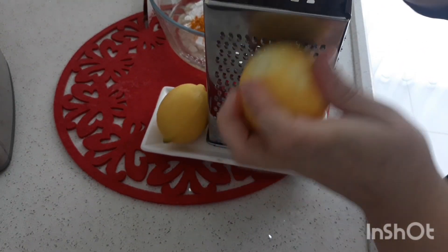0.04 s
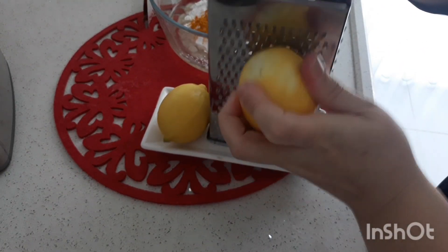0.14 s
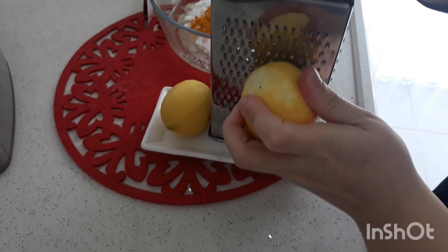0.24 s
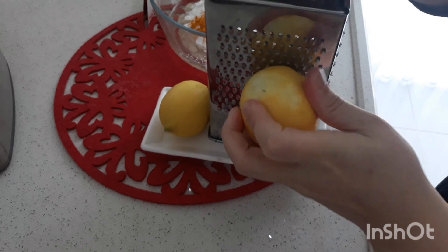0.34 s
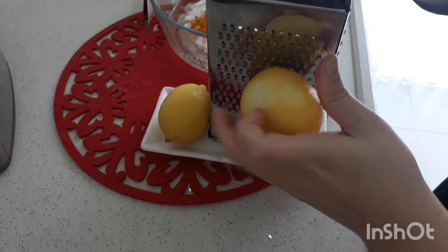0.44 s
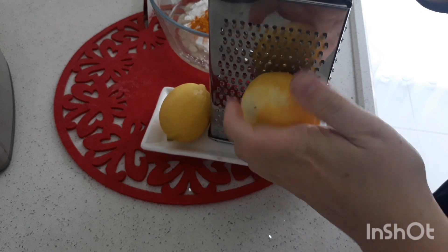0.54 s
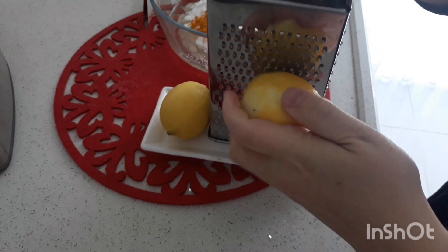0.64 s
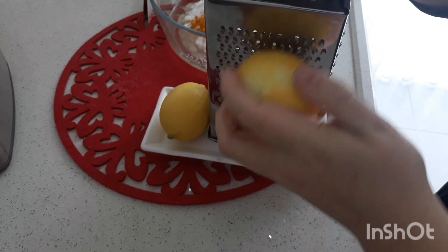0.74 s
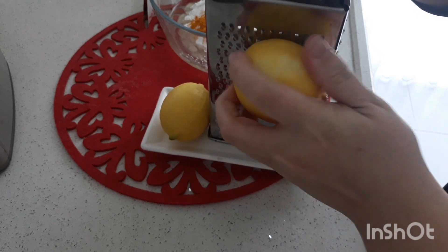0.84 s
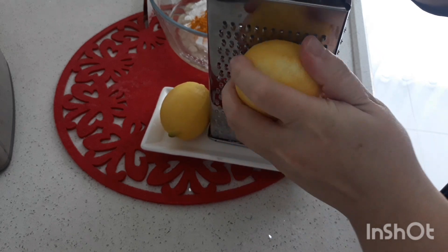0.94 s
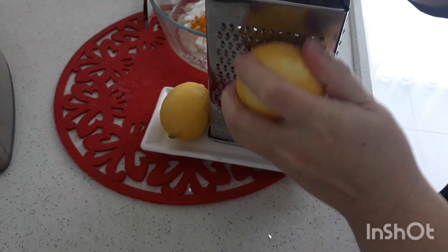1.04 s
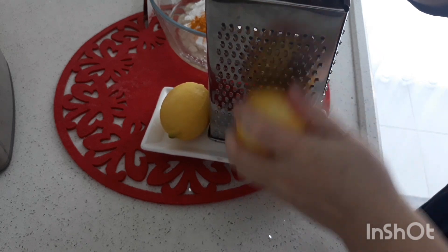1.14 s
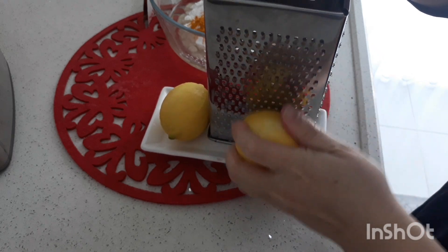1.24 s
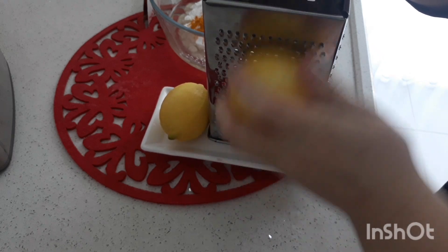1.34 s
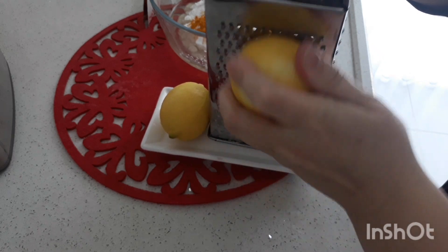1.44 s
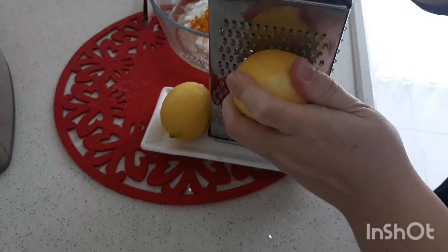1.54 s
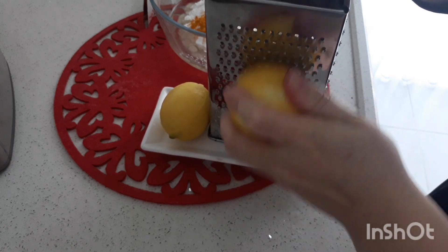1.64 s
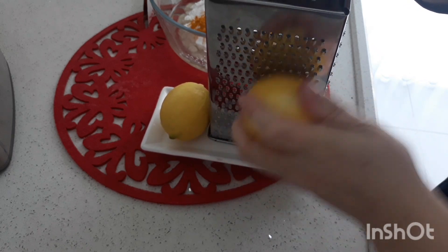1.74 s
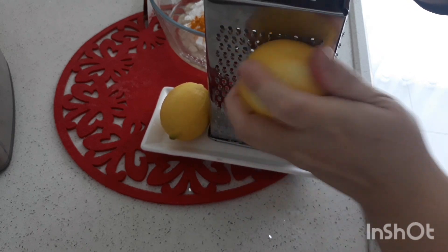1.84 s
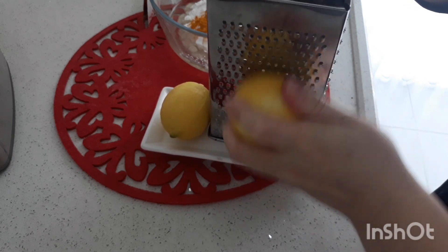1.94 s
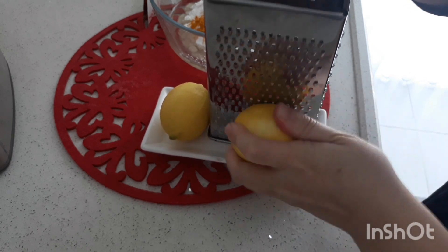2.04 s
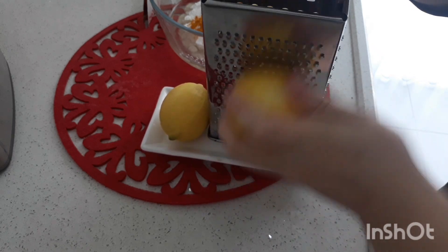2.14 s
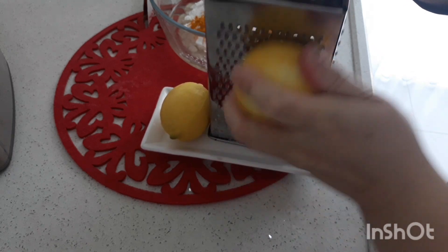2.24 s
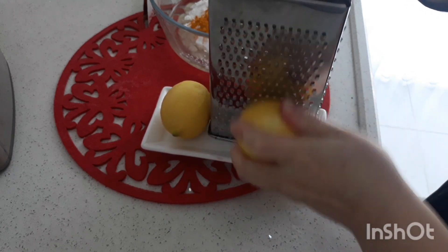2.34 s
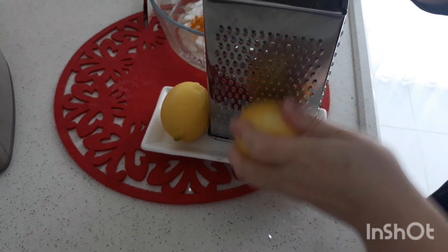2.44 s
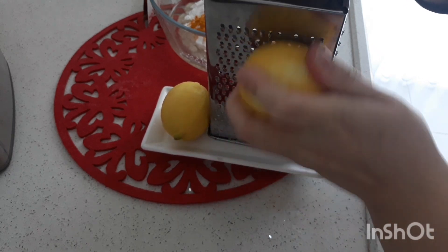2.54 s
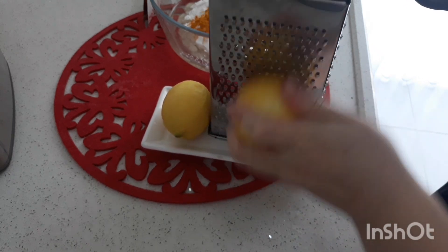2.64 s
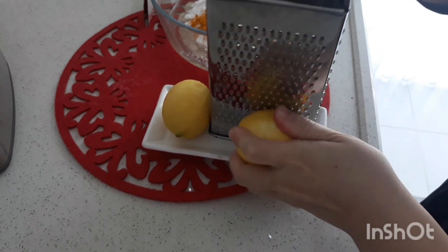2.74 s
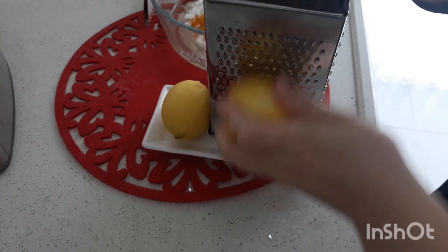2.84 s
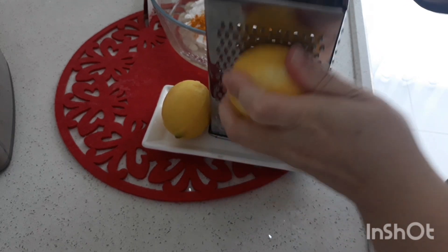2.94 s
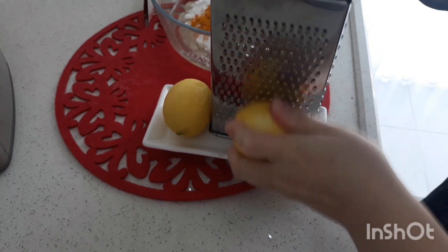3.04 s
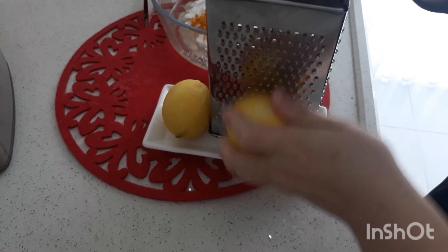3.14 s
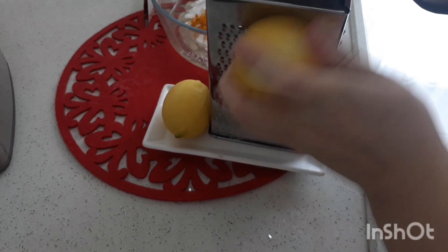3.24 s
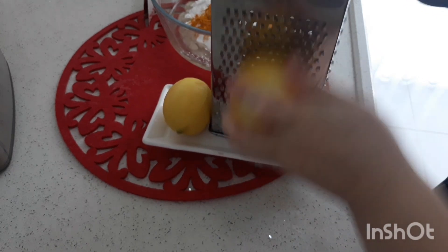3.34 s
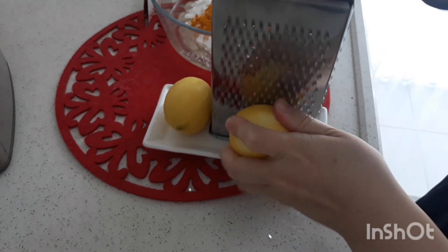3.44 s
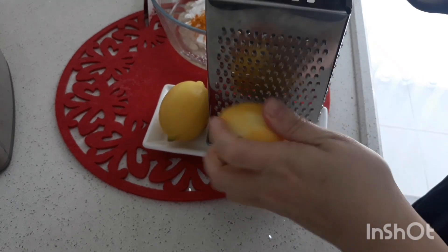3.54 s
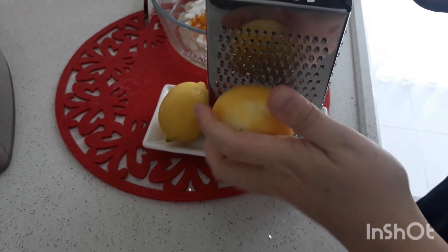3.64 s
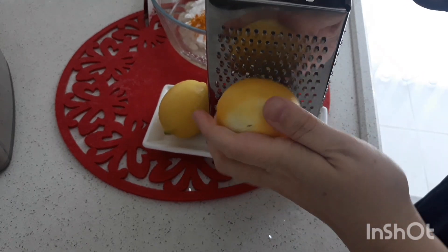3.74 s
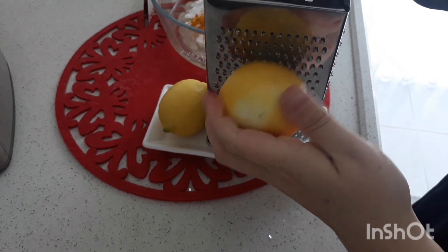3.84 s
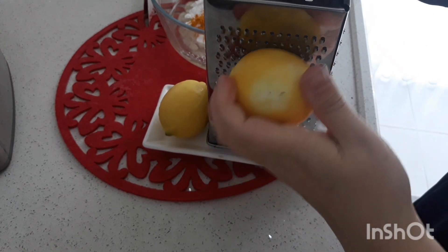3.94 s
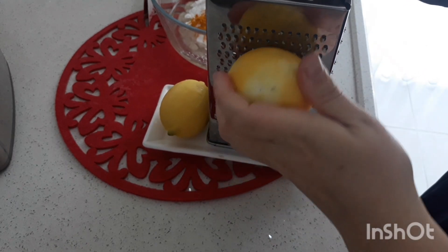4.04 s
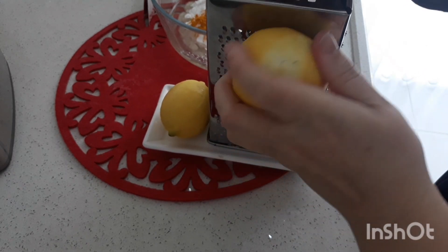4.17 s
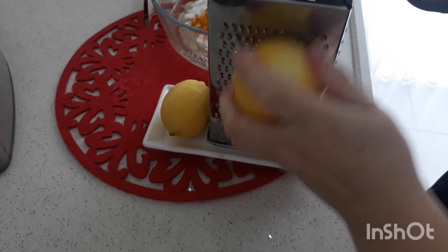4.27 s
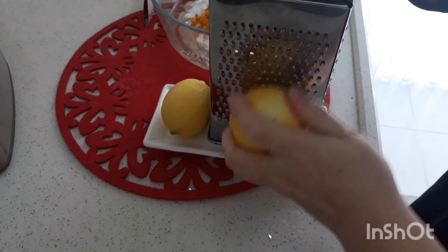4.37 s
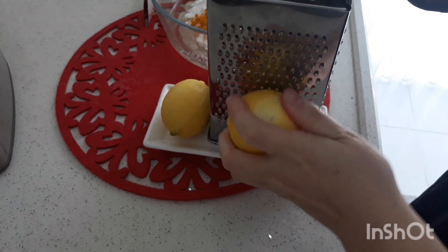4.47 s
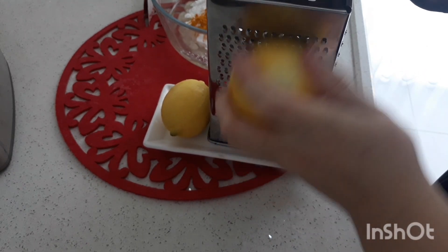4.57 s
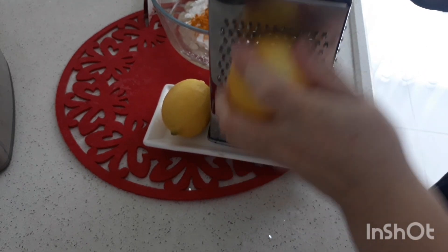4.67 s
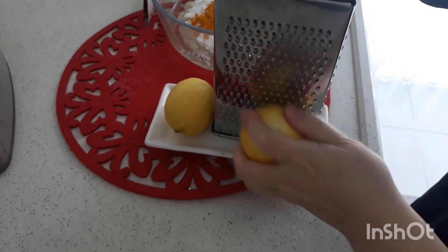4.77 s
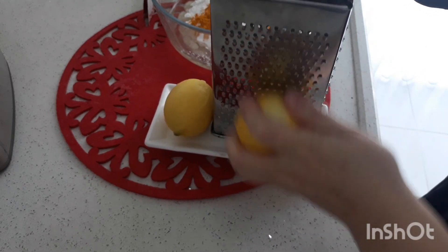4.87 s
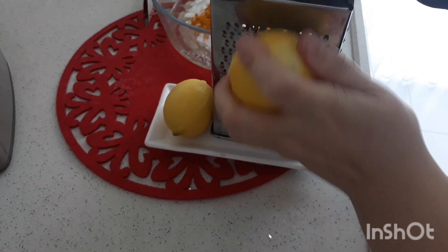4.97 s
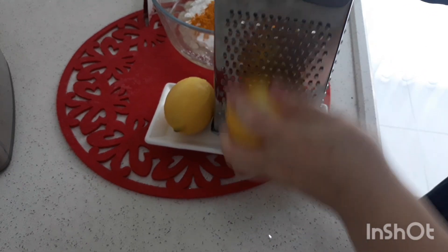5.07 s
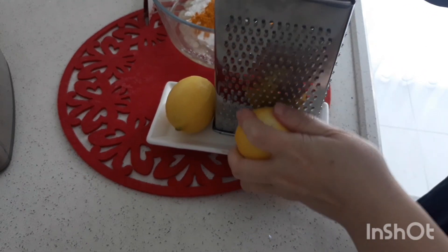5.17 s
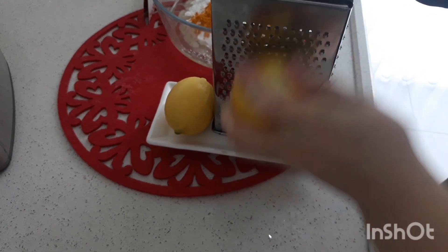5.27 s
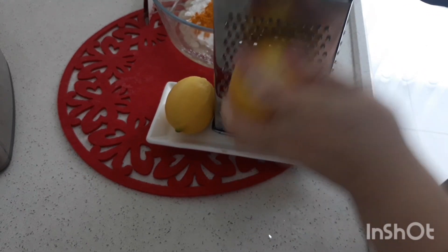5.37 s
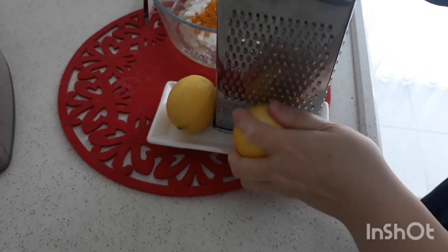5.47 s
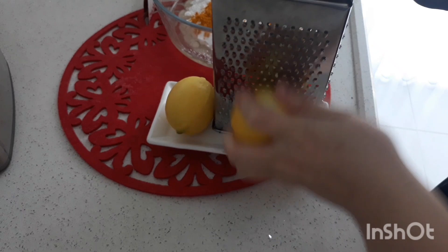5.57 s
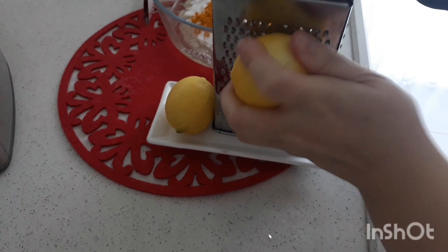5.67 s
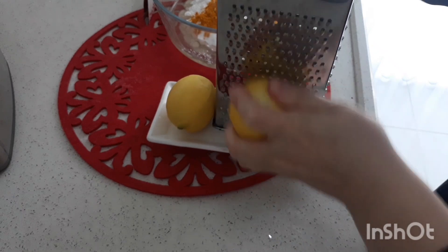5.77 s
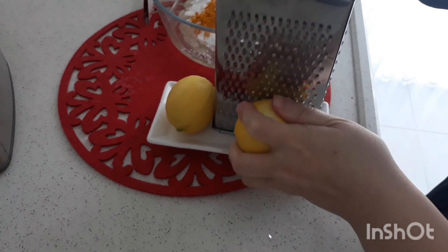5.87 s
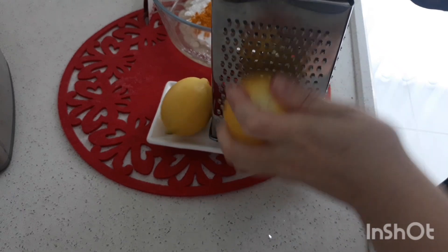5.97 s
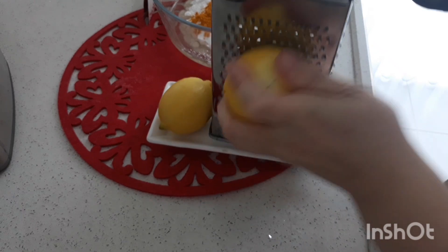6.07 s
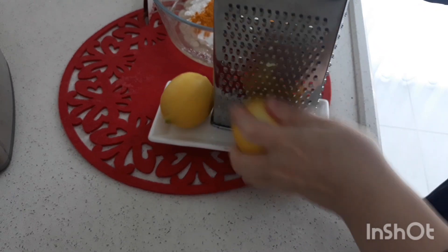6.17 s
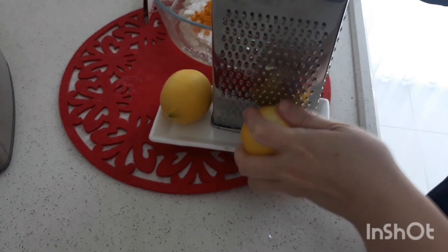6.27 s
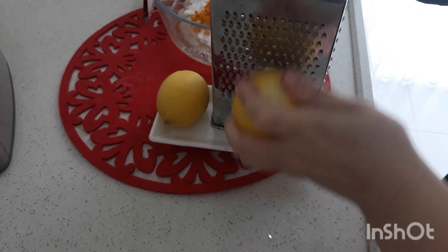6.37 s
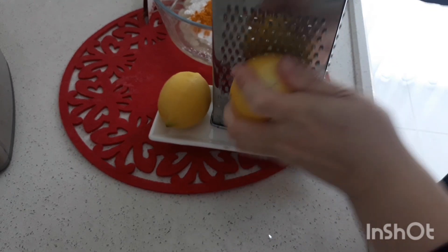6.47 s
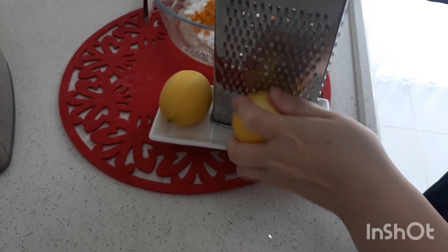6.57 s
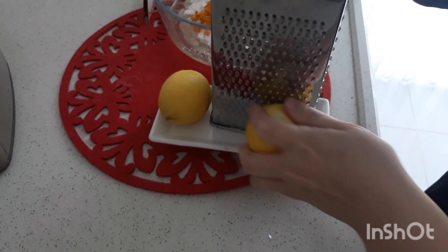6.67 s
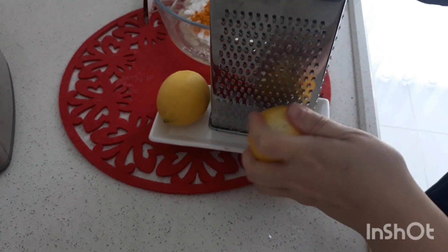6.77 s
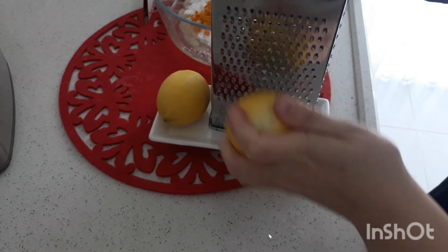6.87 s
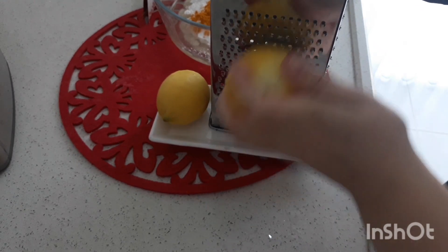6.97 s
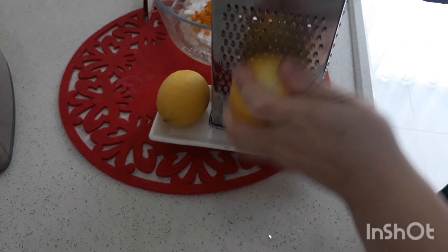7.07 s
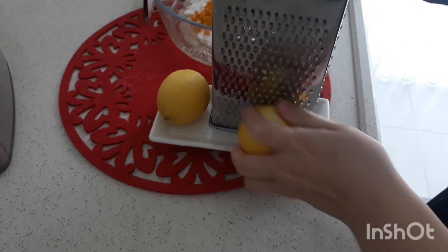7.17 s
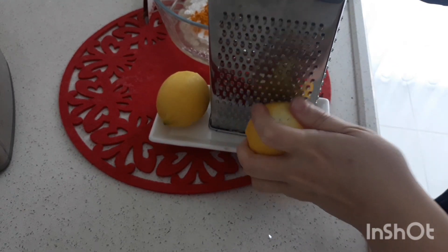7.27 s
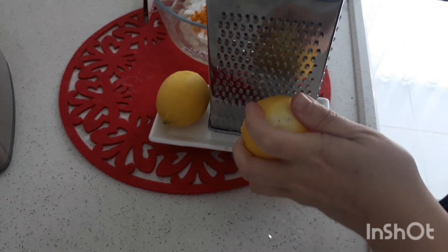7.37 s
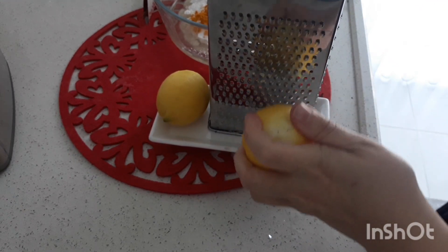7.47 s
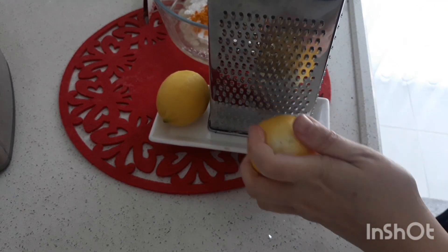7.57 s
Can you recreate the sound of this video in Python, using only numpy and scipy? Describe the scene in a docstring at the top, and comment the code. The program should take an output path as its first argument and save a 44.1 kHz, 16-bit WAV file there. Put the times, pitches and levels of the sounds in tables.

```python
"""Grating a lemon

A lemon is rasped down a steel box grater standing on a china plate. Rows of teeth snag and tear the
rind and shake the sheet steel; the grater rocks and clinks on the plate, and fingers rub the peel.
Hard strokes thump the counter, and a few leave the steel ringing.
A small, live kitchen answers over a low hum."""
import sys
import numpy as np
from scipy import signal
from scipy.fft import rfft, irfft, next_fast_len
from scipy.io import wavfile
from scipy.ndimage import map_coordinates

SR = 44100
rng = np.random.default_rng(int(sys.argv[2]) if len(sys.argv) > 2 else 0)


def inscribe(sig):
    """Save sig as 16-bit PCM at rate SR to the path in sys.argv[1].

    A 1-D sig is mono; a 2-D sig holds one channel per row.
    Samples are clipped to [-1, 1] before scaling.
    """
    pcm = np.round(np.clip(np.atleast_2d(sig).T, -1, 1) * 32767)
    wavfile.write(sys.argv[1], SR, pcm.astype(np.int16))


N = 335586

# tone of tearing rind: freq_hz, level_db
RIND_SPECTRUM = [(25, -46), (55, -21.5), (100, -11), (400, -8), (900, -8.5), (1300, -3), (1800, -6.5),
                 (3300, -2.5), (4900, 0), (6500, -5), (7900, 0), (9000, -9), (10100, -20.5), (11500, -22),
                 (13500, -17), (16000, -22.5)]


def amp(db):
    """Decibels to gain."""
    return 10 ** (np.asarray(db) / 20)


def unit(x):
    """Scale to rms 1."""
    return x / np.sqrt(np.mean(x ** 2) + 1e-20)


def along(points, hz):
    """Read a curve of (freq_hz, value) points on a log frequency axis."""
    freqs, values = np.transpose(points)
    return np.interp(np.log(hz + 1), np.log(freqs), values)


def wobble(rate_hz):
    """A random drift that glides to a new value rate_hz times a second."""
    knots = rng.standard_normal(int(N * rate_hz / SR) + 4)
    return map_coordinates(knots, [np.arange(N) * rate_hz / SR], order=1)


def filtered(x, response):
    """EQ x with a gain given as a function of frequency."""
    size = next_fast_len(len(x) + SR // 2)
    return irfft(rfft(x, size) * response(np.fft.rfftfreq(size, 1 / SR)), size)[:len(x)]


def coloured(x, spectrum, body=lambda hz: 0, size=16384):
    """Minimum-phase EQ of energy 1: a (freq_hz, level_db) curve plus a body's resonances in dB."""
    hz = np.fft.rfftfreq(size, 1 / SR)
    cepstrum = irfft(np.log(amp(along(spectrum, hz) + body(hz))))
    cepstrum[1:size // 2] *= 2
    cepstrum[size // 2 + 1:] = 0
    kernel = irfft(np.exp(rfft(cepstrum)))
    return signal.fftconvolve(x, kernel / np.linalg.norm(kernel))[:len(x)]


def fade(t, t60):
    """Falls 60 dB in t60 seconds."""
    return np.exp(-np.log(1000) * t / np.maximum(t60, 1e-3))


def add(track, start_s, sound):
    """Mix a sound into the track at start_s."""
    start = max(round(start_s * SR), 0)
    track[start:start + len(sound)] += sound[:N - start]


def hand_move(start_s, rise_s, fall_s, easing=1, release_power=1.13):
    """Friction follows the hand as it speeds up from rest and slows to rest again."""
    phase = np.interp(np.arange(N) / SR, start_s + np.cumsum([0, rise_s, fall_s]), [0, np.pi / 2, np.pi])
    return np.abs(np.sin(phase)) ** np.where(phase < np.pi / 2, easing, release_power)


def hum(level_db=-53):
    """The kitchen's room tone: a low, steady bed of noise."""
    # tone of the background: freq_hz, level_db
    hum_spectrum = [(25, -17), (50, -22), (100, -4), (170, -11), (280, -2), (450, -10.5), (700, -19),
                    (1100, -23.5), (2800, -36.5), (7700, -35), (9600, -46.5), (16000, -38.5)]
    return amp(level_db) * unit(coloured(rng.standard_normal(N), hum_spectrum))


def snags(rate_hz, scatter_db=4, rows_db=0.7, row_rate_hz=240, hiss=0.7):
    """Tiny random snaps, clumped as when fruit meets each row of teeth; crowded snaps blur into hiss."""
    size = amp(scatter_db * np.clip(rng.standard_normal(N), -2, 2)) / np.sqrt(rate_hz)
    snaps = (rng.random(N) < rate_hz / SR) * size * rng.choice([-1, 1], N)
    blur = hiss * np.sqrt(rate_hz / np.max(rate_hz)) * rng.standard_normal(N)
    return unit((unit(snaps) + blur) * amp(rows_db * wobble(row_rate_hz)))


def steel_walls(hz):
    """Boost in dB from the sheet steel: its resonances add their power to the plain rasp."""
    # wall resonances, damped by the fruit: pitch_hz, width_hz, level_db (against the plain rasp)
    resonances = [(425, 40, 3), (665, 50, 10), (1217, 60, 3), (1350, 55, 7), (1580, 50, 4), (1997, 40, 10),
                  (2126, 30, 6), (2218, 40, 4), (2616, 120, 0), (3133, 100, 0), (3354, 130, -1),
                  (3652, 70, 3), (4044, 40, 2), (4384, 90, 1), (4902, 40, -1), (5172, 55, 2), (5313, 35, 0),
                  (5457, 45, 1), (5701, 40, 1), (7397, 120, -1), (7950, 45, 0)]
    power = sum(amp(db) ** 2 / (1 + (2 * (hz - pitch) / width) ** 2) for pitch, width, db in resonances)
    return 10 * np.log10(1 + power)


def tooth_pings(centre_hz=4700, spread=.33, t60=0.02, scatter_db=3.0, top_hz=8600, count=7000, size=512):
    """Each tooth that springs free rings for a moment at a pitch of its own."""
    pitch_draw, level_draw = np.hsplit(rng.standard_normal((count, 2)), 2)
    starts = rng.integers(0, N, (count, 1))
    t = np.arange(size) / SR
    hz = centre_hz * np.exp(spread * pitch_draw)
    strength = (hz < top_hz) * amp(scatter_db * np.clip(level_draw, -2, 2))
    rings = strength * np.cos(2 * np.pi * hz * t) * fade(t, t60)
    return unit(np.bincount((starts + np.arange(size)).ravel(), rings.ravel(), N)[:N])


def rasp(level_db=-3.5, ping_db=-8, split_hz=1300, firm_db=-20.5, lift_off_t60=0.13):
    """Each stroke tears the rind and drives the walls, then drags lightly until the fruit lifts off."""
    # strokes of the lemon: start_s, rise_s, fall_s, easing (1 bites at once, 3 creeps in),
    # level_db, low_shelf_db, drag_s, drag_db
    strokes = [ (0.0, 0.006, 0.038, 0.51, -30, 3.5, 0.14, -49.5),
               (0.103, 0.029, .08, 0.92, -27.5, 1.5, .12, -40),
               (1.028, 0.092, 0.11, 2.9, -22.5, 0, .27, -41),
               (1.411, .065, 0.029, 1.2, -32, 2, 0.061, -46.5),
               (1.608, 0.032, .06, 0.91, -26.5, 0, .1, -47),
               (1.85, 0.096, 0.12, 2.86, -20, -4, 0.19, -40.5),
               (2.223, 0.086, 0.08, 1.6, -17, -3, .17, -37),
               (2.568, 0.095, 0.074, 1.75, -14.5, -4, 0.17, -39),
               (2.932, 0.071, .085, 1.1, -17, 0, .2, -37.5),
               (3.279, 0.052, 0.1, 2.2, -12.5, -3.5, .16, -37.5),
               (4.242, 0.089, 0.086, 2, -18, -2, .21, -48), (4.635, 0.086, 0.1, 1.8, -15, -1.5, 0.19, -37),
               (4.995, 0.086, .058, 1.88, -12, -1.5, .16, -36),
               (5.347, 0.064, 0.085, 1.2, -14, -1.5, .19, -39.5),
               (5.681, 0.066, 0.081, 1.6, -20, 1, .12, -39),
               (6.072, 0.076, 0.074, 1.3, -16.5, -0.5, .14, -42),
               (6.447, 0.085, 0.061, 1.7, -20, 1.5, .12, -40),
               (7.037, 0.078, .06, 1.3, -18.5, -1, .09, -42), ]
    t = np.arange(N) / SR
    force, low_force = np.full(N, 1e-9), np.full(N, 1e-9)
    for start_s, rise_s, fall_s, easing, db, low_shelf_db, drag_s, drag_db in strokes:
        since_peak = t - start_s - rise_s
        drag = amp(drag_db) * (since_peak > 0) * fade(np.maximum(since_peak - drag_s, 0), lift_off_t60)
        contact = np.maximum(amp(db) * hand_move(start_s, rise_s, fall_s, easing), drag)
        force += contact
        low_force += amp(low_shelf_db) * contact
    dull_db = np.clip(.2 * (firm_db - 20 * np.log10(force)), 0, 6.5)  # a lighter bite sounds duller
    low_gain = amp(dull_db) * low_force / force
    force *= amp(1.51 * wobble(rate_hz=60))  # the bumpy rind bites unevenly
    # a firm stroke engages many teeth at once; a light one crackles over a few
    teeth = force * snags(rate_hz=350 + 4800 * np.sqrt(force / force.max()))
    lows = filtered(teeth, lambda hz: 1 / (1 + (hz / split_hz) ** 4))
    tearing = coloured(teeth + (low_gain - 1) * lows, RIND_SPECTRUM, steel_walls)
    return amp(level_db) * tearing + amp(ping_db) * force * tooth_pings()


def scratches(level_db=-2):
    """The lemon touches down or catches on the teeth: short, thin scratches."""
    # brief contacts: start_s, level_db, t60_s, rise_s, low_cut_hz
    contacts = [(.012, -37.5, 0.043, .01, 3000), (.138, -16.5, 0.083, .008, 900),
                (.179, -16.5, 0.11, 0.0185, 500), (0.483, -39.5, 0.057, 0.013, 4000),
                (0.6648, -46, 0.097, .01, 1180), (1.478, -14, .05, 0.015, 1500),
                (2.346, -13, 0.075, 0.013, 1000), (2.589, -29, 0.055, .006, 700),
                (2.641, -15.5, 0.068, .008, 1500), (3.171, -28, .1, .03, 600),
                (3.227, -29.5, 0.11, 0.016, 900), (3.411, -12.5, 0.026, 0.0045, 4030),
                (3.908, -46.5, 0.26, 0.081, 6970), (4.114, -48, 0.19, .02, 1500),
                (4.266, -31, 0.051, 0.0065, 600), (4.627, -40.5, 0.093, 0.0091, 2500),
                (4.665, -17, .08, .008, 900), (4.739, -8, 0.091, .008, 1006), (5.022, -16, .07, .008, 900),
                (6.094, -23.5, .05, .005, 900), (6.171, -18.5, 0.066, .008, 700),
                (6.462, -25.5, 0.045, .005, 900), (6.987, -53, 0.11, 0.011, 1980)]
    out, t = np.zeros(N), np.arange(SR // 3) / SR
    for start_s, db, t60, rise_s, low_cut_hz in contacts:
        graze = coloured(rng.standard_normal(len(t)), RIND_SPECTRUM, steel_walls)
        graze = unit(filtered(graze, lambda hz: hz ** 2 / (low_cut_hz ** 2 + hz ** 2)))
        add(out, start_s, amp(db + level_db) * graze * fade(t, t60) * (1 - fade(t, rise_s)))
    return out


def clinks(ring_db=-4.5, crack_db=-2.0, hold_s=0.028):
    """The grater's rim lands on the plate; the contact point decides which modes ring."""
    # rim landings: start_s, level_db, hardness_db, contact_point (0 side, 1 rear, 2 and up front)
    landings = [(0.1031, -13, 1, 0.88), (0.1389, -15, -2, 1.83), (0.318, -32.5, -14, 1.5),
                (0.508, -31.5, -11.5, 1.84), (0.8012, -39, -25, 1.66), (1.404, -16, -6, 1.32),
                (1.496, -23, -16, 1.8), (2.2211, -18, 0.5, 1), (2.936, -17.5, -3.5, 0.035),
                (3.256, -25.5, -4.5, 1.66), (3.4745, -19.5, -7, 1.5), (3.499, -22.5, -2.5, 1.9),
                (4.0124, -29, -10, 1.89), (4.266, -35, -13, 2.9), (4.667, -16.5, -11.5, 1.66),
                (5.344, -18, -4.5, 0.31), (5.6615, -31.5, -15, 0.38), (5.731, -24, -3.5, 2),
                (5.9629, -16.5, -5, 1.9), (6.062, -22.5, -9.5, 1.8), (6.793, -21.5, -10.5, 1.89),
                (7.034, -28, -9, 1.98), (7.354, -26.5, -0.5, 1.15)]
    # modes of rim and plate, by where they are struck: pitch_hz, t60_s, side_db, rear_db, front_db
    rim_modes = [(699, 0.14, -9.5, -13, -18.5), (1116, 0.45, -16, -14.5, -18.5),
                 (1333, 0.08, -15, -42.5, 5), (1433, 0.16, -25.5, -26, -3.5), (1576, 0.1, -10.5, 3, -5),
                 (1713, 0.18, -12.5, -8.5, -20), (2450, 0.079, 1.5, -3.5, -10),
                 (2650, 0.38, -17, -14, -12.5), (3290, 0.11, -17, -12, -17), (4660, 0.34, -11, -8.5, -19.5),
                 (4490, 0.2, -8.5, -3, -29.5), (5120, .07, -9, -21, -22), (6400, 0.069, -14.5, -22.5, -33),
                 (7300, .06, -32, -9.5, -25), (7340, 0.1, -12, -9.5, -28)]
    # crack of steel on china: freq_hz, level_db
    crack_spectrum = [(100, -21.5), (450, -3), (900, -0.5), (3000, 0), (8000, 0), (9800, -22),
                      (16000, -28.5)]
    out, t = np.zeros(N), np.arange(SR // 4) / SR
    # each clink holds for a moment, then dies away quickly
    shape = (1 - fade(t, 0.0026)) * np.exp(-(t / hold_s) ** 2)
    for start_s, db, hardness_db, point in landings:
        ring = np.zeros(len(t))
        for hz, t60, *struck_db in rim_modes:
            strength = amp(np.interp(point, [0, 1, 2], struck_db) + rng.normal(0, 1))
            ring += strength * fade(t, t60) * np.sin(2 * np.pi * (hz * t + rng.random()))
        crack = coloured(rng.standard_normal(len(t)) * fade(t, t60=.05), crack_spectrum)
        add(out, start_s, amp(db) * (amp(ring_db) * ring * shape + amp(crack_db + hardness_db) * crack))
    return out


def thumps(rest_hz=138, pressed_hz=160, relax_t60=0.15, t60=0.43, rise_s=0.075):
    """Plate and counter boom softly as a stroke ends; the pitch sags as the hand lets up."""
    # blows to the counter: start_s, level_db
    blows = [(.18, -33.5), (1.127, -39), (1.519, -47), (2.33, -44.5), (2.7, -41), (3.039, -40),
             (3.378, -36), (4.347, -45.5), (4.771, -35), (5.1, -47), (5.474, -36), (5.79, -39),
             (6.189, -32)]
    out, t = np.zeros(N), np.arange(SR // 2) / SR
    cycles = np.cumsum(rest_hz + (pressed_hz - rest_hz) * fade(t, relax_t60)) / SR
    boom = np.sin(2 * np.pi * cycles) * fade(t, t60) * (1 - fade(t, rise_s))
    for start_s, db in blows:
        add(out, start_s, amp(db) * boom)
    return out


def finger_rubs(level_db=-2, focus_db=7, width_hz=450):
    """Skin slides on waxy peel: soft, dull rubs, each centred on a pitch of its own."""
    # shifts of grip: start_s, rise_s, fall_s, level_db, centre_hz
    rubs = [(.32, 0.062, 0.14, -50, 1500), (.795, 0.013, 0.084, -52, 1800), (.87, 0.17, .08, -60.5, 1950),
            (3.468, 0.043, 0.046, -35, 1250), (3.953, .012, 0.077, -54, 1600),
            (4.107, 0.0097, .06, -51.5, 1550), (4.2, .05, .03, -54.5, 1300),
            (4.94, 0.039, 0.038, -43.5, 1450), (5.9, 0.063, 0.033, -32.5, 1550),
            (7.53, 0.035, .04, -60, 1600)]
    # tone of skin on peel: freq_hz, level_db
    skin_spectrum = [(200, -21), (900, -6.5), (1400, -9.5), (1900, -4.5), (2500, -11.5), (4500, -10.5),
                     (8000, -21), (10000, -34.5), (16000, -33)]
    out, slips = np.zeros(N), snags(rate_hz=540)
    for start_s, rise_s, fall_s, db, centre_hz in rubs:
        focus = lambda hz: focus_db / (1 + (2 * (hz - centre_hz) / width_hz) ** 2)
        friction = coloured(slips, skin_spectrum, focus)
        out += amp(level_db + db) * hand_move(start_s, rise_s, fall_s) * friction
    return out


def plate_nudges(t60=0.15):
    """The plate shifts on its mat: soft, padded bumps with no ring."""
    # shifts of the plate: start_s, level_db
    bumps = [(.803, -42), (6.433, -43.5), (6.989, -45), (7.008, -48)]
    # muffled tone of the mat: freq_hz, level_db
    mat_spectrum = [(60, -34), (200, -16), (390, 3.5), (700, -8), (1500, -21), (6000, -47)]
    out, t = np.zeros(N), np.arange(SR // 4) / SR
    for start_s, db in bumps:
        add(out, start_s, amp(db) * coloured(rng.standard_normal(len(t)) * fade(t, t60), mat_spectrum))
    return out


def steel_ring(rise_s=0.13, waver_db=2.0, waver_rate_hz=25):
    """Once the fruit slides off, the undamped steel sings on, wavering under the holding hand."""
    # the fruit leaves the steel: start_s, level_db
    releases = [(4.37, -44), (4.77, -37.5), (5.095, -20.5), (6.175, -29.5)]
    # free modes of the steel: pitch_hz, level_db, t60_s
    steel_modes = [(581, -13, .9), (1265, 0, .5), (1357, -1, .85), (2128, -2, .5), (3343, -13, .45),
                   (3467, -11, .3), (4044, -13, .35), (5432, -13, .3)]
    out, t = np.zeros(N), np.arange(SR) / SR
    for start_s, db in releases:
        for hz, mode_db, t60 in steel_modes:
            strength = amp(db + mode_db + waver_db * wobble(waver_rate_hz)[:len(t)])
            tone = np.sin(2 * np.pi * (hz * t + rng.random()))
            add(out, start_s, strength * tone * fade(t, t60) * (1 - fade(t, rise_s)))
    return out


def kitchen_reverb(x, predelay_s=.006, block=16384):
    """Diffuse room tail, fresh for each block as the moving arm changes it; treble dies first."""
    # decay of the room: freq_hz, t60_s
    decay_times = [(150, 1), (600, 0.64), (1500, 0.46), (4000, 0.46), (8000, 0.3), (11000, 0.1),
                   (15000, 0.2)]
    out = np.zeros(N)
    for start in range(0, N, block):
        hz, t, noise_bands = signal.stft(rng.standard_normal(SR * 2 // 3), SR, nperseg=256)
        tail = signal.istft(noise_bands * fade(t, along(decay_times, hz)[:, None]), SR)[1]
        tail = np.pad(tail / np.linalg.norm(tail), (round(predelay_s * SR), 0))
        add(out, start / SR, signal.fftconvolve(x[start:start + block], tail))
    return out


def scene(grating_send_db=-8, rocking_send_db=-10):
    """A close mono mix; the grating and the rocking feed the reverb."""
    grating = rasp() + scratches() + finger_rubs()
    rocking = clinks() + plate_nudges()
    room = kitchen_reverb(amp(grating_send_db) * grating + amp(rocking_send_db) * rocking)
    return (grating + rocking + steel_ring() + thumps() + room + hum())[None]


def record(dry):
    """Round off the tallest peaks, then cut the deepest bass and the very top."""
    ceiling, knee, low_cut_hz, top_hz = .8, 5, 48, 15850
    rounded = dry / (1 + np.abs(dry / ceiling) ** knee) ** (1 / knee)
    band = lambda hz: (hz < top_hz) * hz ** 4 / np.hypot(hz ** 4, low_cut_hz ** 4)
    return np.array([filtered(channel, band) for channel in rounded])


dry = scene()
out = record(dry)
inscribe(out)
```